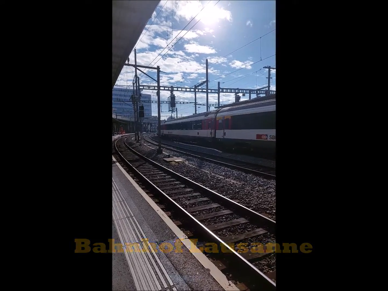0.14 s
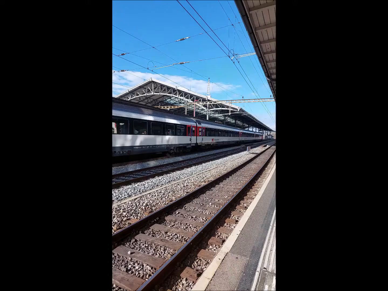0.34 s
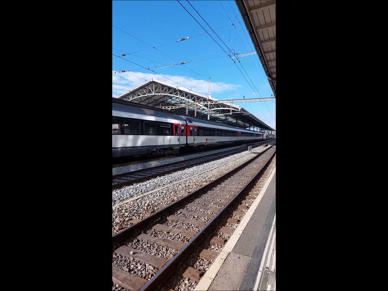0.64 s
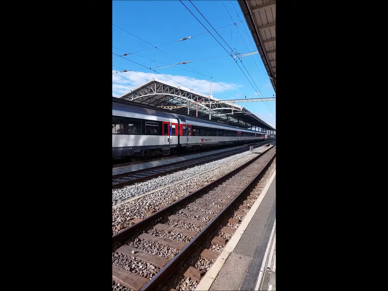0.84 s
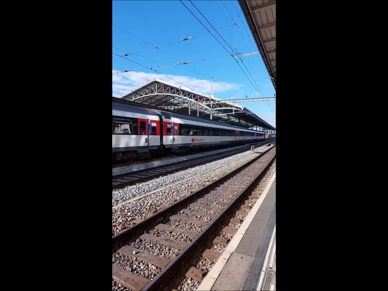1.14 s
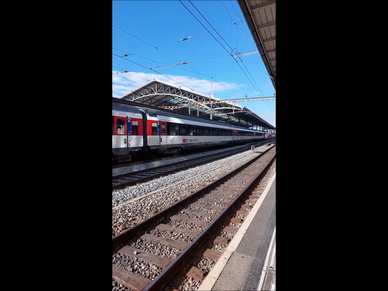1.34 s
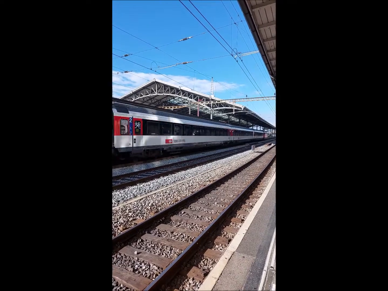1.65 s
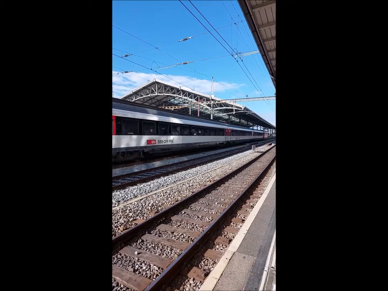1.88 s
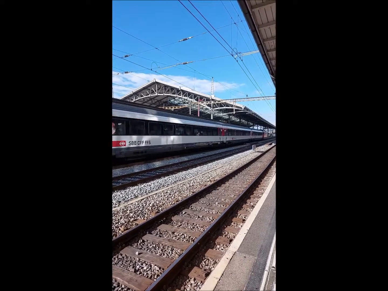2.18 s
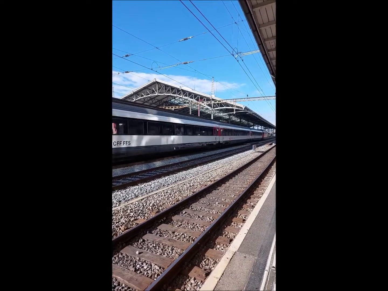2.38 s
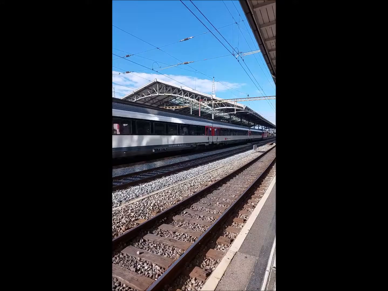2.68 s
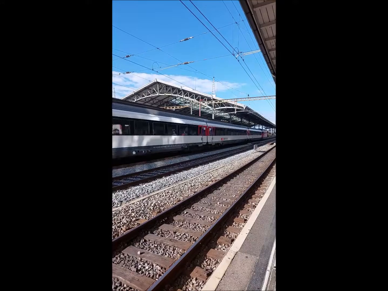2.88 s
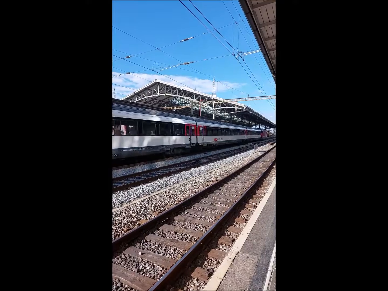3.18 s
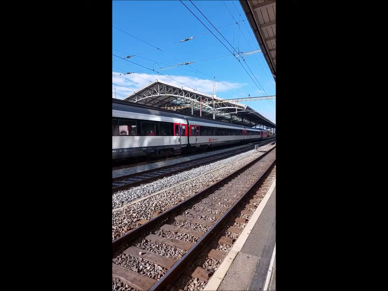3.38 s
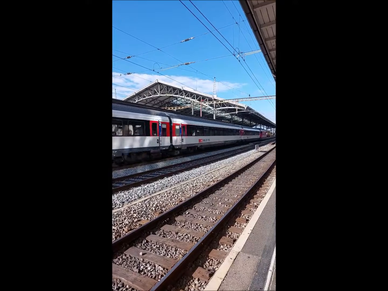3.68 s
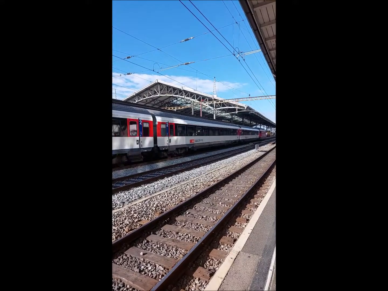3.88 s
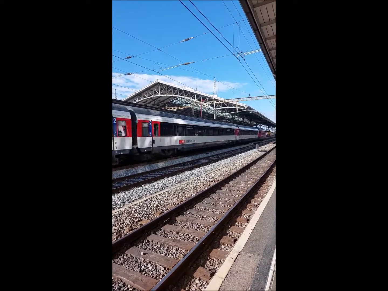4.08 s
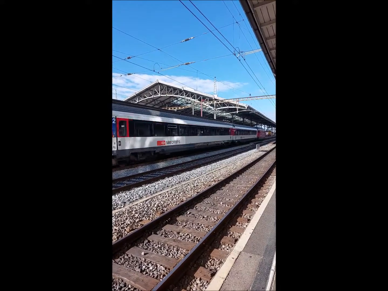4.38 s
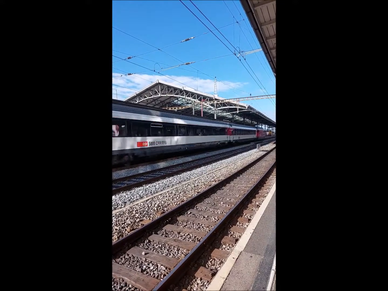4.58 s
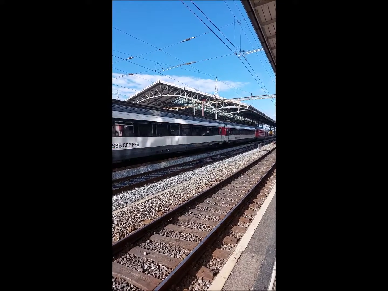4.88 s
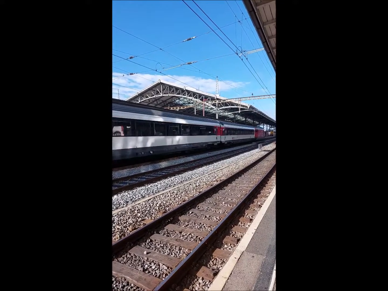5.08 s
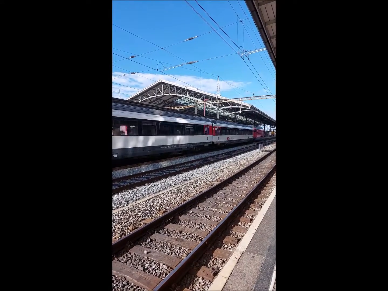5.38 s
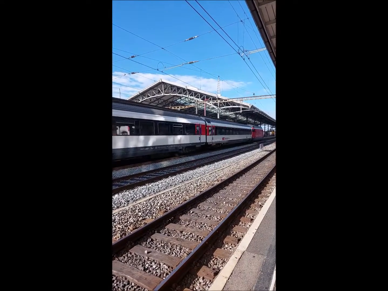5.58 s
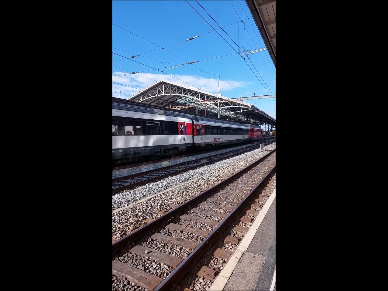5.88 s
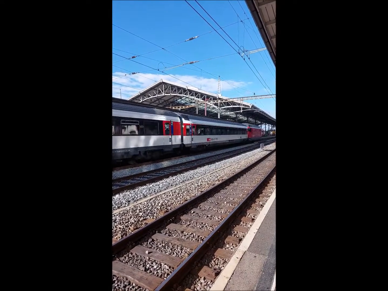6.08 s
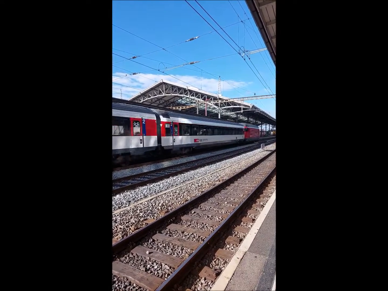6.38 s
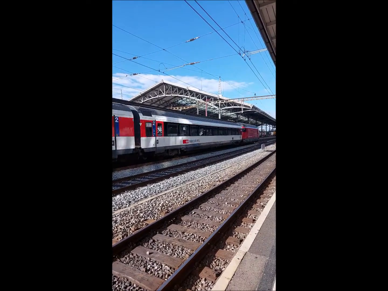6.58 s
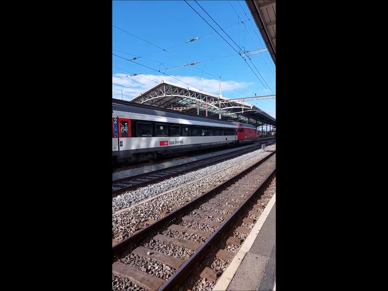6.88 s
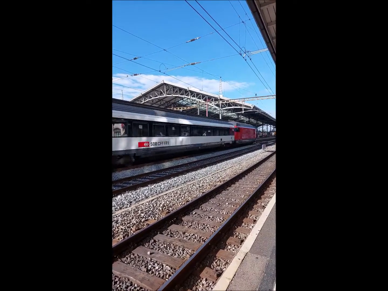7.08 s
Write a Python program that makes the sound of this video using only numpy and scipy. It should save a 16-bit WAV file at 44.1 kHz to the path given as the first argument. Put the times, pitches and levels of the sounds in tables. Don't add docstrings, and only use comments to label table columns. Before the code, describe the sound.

From 0 to 0.25 s a distant train gives a quiet, dull low rumble, then complete silence until about 0.47 s. The closer shot fades in over the next second: slow rolling rumble, soft bright hiss and faint very high wheel whistles. A low motor hum wavers in strength and rises slightly in pitch. Around 1.9 to 2.7 s the rolling grows heavier. At 2.85 s a wheel set bites suddenly, with a dull knock, rough grinding and several steady piercing squeals that overlap and swell until about 4.3 s. At 4.4 s the last set brings the strongest hiss and a denser chord of shrill tones, sinking slightly in pitch. Joint knocks follow near 4.5 and 4.8, hardest at 5.6, then 6.3 s. Squeals thin after 6.3 s while scraping continues; a final jolt and brief flare come near 7.1 s. Open-air stereo, treble wide, bass centred.

```python
import sys
import numpy as np
from scipy import signal
from scipy.fft import rfft, irfft, next_fast_len
from scipy.io import wavfile
from scipy.ndimage import uniform_filter1d, map_coordinates

SR = 44100
rng = np.random.default_rng(int(sys.argv[2]) if len(sys.argv) > 2 else 0)


def unload_audio(sound):
    columns = np.transpose(np.atleast_2d(sound))
    steps = np.round(np.clip(columns, -1, 1) * 32767)
    wavfile.write(sys.argv[1], SR, steps.astype(np.int16))


def invert_db(level):
    return 10 ** (np.asarray(level, dtype=float) / 20)


N = 319725

# start t/s, loudest t/s, end t/s, loudest level/dB, ending level/dB
EARLY_SQUEALS = [
    [(.47, .475, 0.78, -45, -51.5), (.8, 1.14, 1.45, -51.5, -58), (1.5, 1.9, 2.26, -50.5, -51),
     (2.1, 2.45, 2.64, -48.5, -47.5), (2.4, 2.75, 3.1, -48, -54), (2.8, 2.86, 3, -38.5, -42)],
    [(1.6, 1.95, 2.42, -52, -59), (2.4, 2.72, 2.93, -47, -52)],
    [(1.6, 1.95, 2.9, -58, -55)],
    [(2.83, 2.86, 2.98, -35.5, -45), (2.98, 3.33, 3.48, -37, -40), (4.1, 4.42, 4.93, -31.5, -49)],
    [(2.88, 2.97, 3.12, -36, -42), (2.95, 3.17, 3.4, -35, -37.5), (3.2, 3.32, 3.45, -43, -52)],
    [(2.84, 2.98, 3.3, -42, -42), (3.2, 3.46, 3.96, -31, -31), (3.6, 3.82, 4.1, -36, -32.5),
     (3.95, 4.13, 4.42, -35, -43.5)],
    [(3.4, 3.55, 4.3, -41.5, -42), (3.55, 3.78, 4.3, -39, -43), (3.9, 4.06, 4.4, -47, -59)],
    [(2.83, 2.88, 3.2, -38, -42), (2.95, 3.22, 3.8, -33, -36.5), (3.2, 3.45, 3.65, -32, -44),
     (3.55, 3.8, 4.7, -33, -39)],
]
# start t/s, loudest t/s, end t/s, loudest level/dB, ending level/dB
LAST_SQUEALS = [
    [(4.5, 4.55, 4.98, -34.5, -38.5), (4.8, 5.05, 5.47, -35.5, -43), (5.2, 5.42, 5.9, -38, -43)],
    [(4.55, 4.65, 4.95, -33.5, -33.5), (4.75, 5.1, 5.35, -31.5, -32), (5.1, 5.35, 5.84, -33, -34.5),
     (5.5, 5.85, 6.29, -29, -35.5), (6.0, 6.25, 6.94, -37, -42), (6.5, 6.85, 7.2, -42, -37)],
    [(4.6, 5.2, 5.58, -31, -30.5), (5.4, 5.65, 6.15, -31.5, -34.5), (5.9, 6.2, 6.9, -35, -45),
     (6.5, 6.8, 7.16, -46, -47)],
    [(4.68, 4.71, 4.6, -38, -46), (4.8, 4.95, 5.6, -30.5, -35.5), (5.3, 5.6, 6.25, -36.5, -39),
     (5.8, 6.15, 7.4, -40, -46)],
    [(4.39, 4.53, 4.9, -36, -46), (4.7, 4.92, 5.4, -34.5, -44), (5.1, 5.35, 6.0, -46, -46),
     (5.7, 6.1, 7.5, -50, -50)],
]
# first f/Hz, last f/Hz, glide ends t/s
MODE_GLIDES = [(4810, 4735, 2.0), (14512, 14518, 2.8), (9452, 9440, 2.8), (2368, 2364, 5.0),
               (3200, 3165, 3.4), (4005, 3930, 4.0), (8130, 8132, 4.2), (12140, 12070, 3.7),
               (3250, 3165, 5.8), (4702, 4552, 5.95), (7750, 7515, 6.6), (12415, 12145, 5.8),
               (14275, 14120, 5.1)]
# line width f/Hz, halo width f/Hz, halo level/dB
MODE_SHAPES = [(22, 300, 2), (7, 200, -4), (20, 400, 1), (14, 220, -1), (10, 180, -3), (8, 280, -2),
               (4, 300, -4), (9, 340, -2), (22, 220, 1), (9, 190, -1), (9, 260, -1), (9, 340, -1.5),
               (12, 240, -1)]


def squeals():
    flutter_db = 0.7
    blurs_per_db = 1.36
    out = np.zeros((2, N))
    for swells, glide, shape in zip(EARLY_SQUEALS + LAST_SQUEALS, MODE_GLIDES, MODE_SHAPES):
        first_hz, last_hz, settled_s = glide
        line_hz, halo_hz, halo_db = shape
        first_s, last_s = swells[0][0], swells[-1][2]
        a = round((first_s - CATCH_S) * SR)
        b = min(N, round((last_s + RELEASE_S) * SR))
        t = np.arange(a, b) / SR
        power = sum(swell_power(t, *row) for row in swells)
        level = np.sqrt(power) * invert_db(flutter_db * wobble(22)[a:b])
        sag_db = 20 * np.log10(np.maximum.accumulate(level) / level)
        pitch_hz = np.interp(t, [first_s, settled_s], [first_hz, last_hz])
        tone = sing(pitch_hz, 2.26, line_hz, halo_hz, halo_db + blurs_per_db * sag_db, alike=0.12)
        out[:, a:b] += level * tone
    return out


CATCH_S, RELEASE_S = .03, .08


def swell_power(t, start, top, end, top_db, end_db):
    times = [start - CATCH_S, start, top, end, end + RELEASE_S]
    levels_db = [top_db - 52, top_db - 14, top_db, end_db, end_db - 23]
    return invert_db(np.interp(t, times, levels_db)) ** 2


# start t/s, loudest t/s, end t/s, first f/Hz
SINKING_MODES = [(.47, 1.0, 2.2, 3955), (.7, .9, 1.6, 2345), (.47, .7, 1.0, 9650), (.9, 1.15, 1.7, 15560),
                 (2.84, 3.2, 3.9, 6680), (2.84, 3.2, 3.5, 9790), (2.84, 2.93, 3.15, 11430),
                 (2.84, 3.05, 3.3, 14140), (2.84, 2.9, 3.4, 14950), (4.45, 4.5, 5.0, 7700),
                 (4.39, 5.0, 6.0, 4045), (4.39, 4.6, 6.9, 5830), (4.39, 4.47, 4.75, 6730),
                 (4.39, 4.5, 5.0, 10520), (4.39, 4.7, 5.9, 11040), (4.39, 4.5, 4.8, 11600),
                 (4.39, 4.45, 5.0, 12120), (5.2, 5.7, 6.1, 15050), (5.0, 5.6, 7.25, 2330),
                 (6.3, 6.9, 7.25, 11610), (7.12, 7.21, 7.4, 2700), (7.12, 7.22, 7.4, 2120),
                 (7.1, 7.22, 7.4, 7630), (7.08, 7.18, 7.3, 3620), (7.08, 7.16, 7.3, 14520),
                 (7.08, 7.16, 7.3, 13600)]
# start t/s, loudest t/s, end t/s, f/Hz
HELD_MODES = [
    (1.7, 2.7, 2.9, 10933),
    (4.39, 4.5, 4.9, 15080),
    (3.4, 3.65, 3.9, 1408),
    (4.4, 4.8, 5.1, 482),
    (3.1, 3.25, 3.45, 337),
    (2.72, 2.84, 2.93, 285),
    (4.39, 4.5, 5.4, 9650),
    (7.02, 7.08, 7.14, 95),
    (5.25, 5.38, 5.5, 4000),
]
WEAK_LEVELS = [-58.5, -55.5, -54, -59, -43.5, -41.5, -41, -44, -45, -56, -40, -46, -36.5, -40, -37, -38,
               -37, -47, -46, -56, -39, -42.5, -41, -46, -45, -44, -67, -47, -55, -48.5, -45, -33, -40, -43,
               -38]


def weak_squeals():
    pitch_losses = [.01] * len(SINKING_MODES) + [0] * len(HELD_MODES)
    out = np.zeros((2, N))
    for mode, loss, peak_db in zip(SINKING_MODES + HELD_MODES, pitch_losses, WEAK_LEVELS):
        start, top, end, hz = mode
        a = round(start * SR)
        t = np.arange(a, min(N, round(end * SR))) / SR
        swell_db = np.interp(t, [start, start + 0.028, top, end], [-9, -3.5, 1.0, -12.5])
        pitch_hz = hz * (1 - loss * (t - start))
        alike = along(LIKENESS, hz) + 0.11
        tone = sing(pitch_hz, peak_db + swell_db + 3.5, 14.6, hz / 22, 2.0, alike)
        out[:, a:a + len(t)] += tone
    return out


# t/s, level/dB
FLANGE_PRESSURE = [(.46, -39.5), (1.33, -41.5), (1.45, -46), (2.18, -48), (2.41, -47), (2.8, -43),
                   (2.86, -29), (3.4, -28.5), (3.65, -34.5), (4.1, -33), (4.38, -29.5), (4.42, -22.5),
                   (4.6, -24), (5.1, -25), (5.5, -26.5), (7.0, -28), (7.09, -29), (7.17, -25)]
# t/s, changeover time/s
HISS_CHANGES = [
    (1.65, 0.57),
    (2.825, 0.03),
    (4.39, 0.04),
]
# f/Hz, level per Hz/dB
HISS_COLOURS = [
    [(2500, -19), (3300, -9), (4300, -7), (5400, -3.5), (5800, -4), (6200, -7), (7400, -3.5), (8200, -7),
     (8650, -7), (9500, -3.5), (10500, -5), (12800, -1), (14000, -7), (15700, -5)],
    [(2500, -30), (3300, -7), (4300, -7), (5150, -16), (5650, -24), (6400, -16), (7400, -12), (8200, -14),
     (8620, -31), (9300, -4), (10500, -6), (12800, 3), (14000, -3), (15700, -3)],
    [(2500, -26), (3000, -6), (3450, -14), (3900, -5), (4450, -7), (4800, 1.5), (5400, -3.5), (6200, -3),
     (6700, -1), (7600, 0.5), (8800, -4.5), (9600, -2.5), (10700, -6.5), (11900, 3.5), (14200, -6.5),
     (15700, -5)],
    [(2000, -22.5), (2750, -4), (3450, -10.5), (3900, -6.5), (4300, -8.5), (4800, -2.5), (5300, -10.5),
     (5750, -3.5), (6250, -13), (6500, -5.5), (7600, -3.5), (8700, -10), (9600, -6.5), (10500, -9),
     (12200, -2.5), (13200, -5.5), (14000, -8), (14700, -15), (15700, -3.5)],
]
# f/Hz, level per Hz/dB
GRIND_COLOUR = [(700, -12.5), (1200, -8.5), (1800, -3.5), (2400, 0.5), (3300, -8.5), (4200, -7),
                (4900, -28), (5300, -70)]
# t/s, extra level/dB
BITES = [
    (2.86, 5.5),
    (4.2, 4),
    (7.2, 2.5),
]
USUAL_PRESSURE_DB = -30


def scrape():
    hiss_db, = curves(FLANGE_PRESSURE)
    press_db = hiss_db - USUAL_PRESSURE_DB
    flutter_db = 0.3 * wobble(30) + .3 * wobble(9)
    bite_db = flares(BITES, rise_s=0.035, fall_s=0.19)
    grind_db = -39 + 0.82 * press_db + bite_db + 0.79 * wobble(5.4)
    t = np.arange(N) / SR
    arrived = [np.clip((t - s) / over + .5, 0, 1) for s, over in HISS_CHANGES]
    shares = -np.diff([np.ones(N), *arrived, np.zeros(N)], axis=0)
    hiss = np.zeros((2, N))
    for share, colour in zip(shares, HISS_COLOURS):
        hiss += np.sqrt(np.abs(share)) * rush(colour, patchy_db=1.5)
    grind = rush(GRIND_COLOUR, patchy_db=1.8)
    return invert_db(flutter_db) * (invert_db(hiss_db) * hiss + invert_db(grind_db) * grind)


# t/s, level/dB
TRACK_LOAD = [(.46, -45.5), (1.0, -46), (1.85, -43.5), (2.05, -39), (2.3, -38.5), (2.58, -37),
              (2.72, -35.5), (2.84, -36), (2.93, -37.5), (3.6, -41.5), (4.4, -39), (5.4, -40), (6.0, -39.5),
              (6.9, -38), (7.25, -37)]
# t/s, extra level/dB
JOINTS = [
    (1.95, 3.5),
    (2.84, 6.5),
    (4.54, 5.5),
    (4.83, 5),
    (5.57, 11.5),
    (5.79, 4.5),
    (6.28, 6),
    (6.91, 0.5),
    (7.075, 8.5),
]
# f/Hz, level per Hz/dB
GROUND_COLOUR = [(22, -40), (40, -12), (60, -0.5), (110, -1.5), (170, -1.5), (260, -62)]
# t/s, f/Hz
SLEEPER_PITCH = [(.46, 272.8), (1.2, 261), (2.7, 272.1), (3.4, 257.4), (5.5, 252.4), (6.7, 239.6),
                 (7.25, 265.2)]
# f/Hz, level per Hz/dB
TRACK_COLOUR = [(120, -24), (190, -5), (230, -6.5), (270, -1), (320, -4.5), (400, -10), (460, -7),
                (560, -48)]
# f/Hz, level per Hz/dB
ROAR_COLOUR = [(300, -35), (430, -2.5), (480, 4), (560, 0), (800, -5.5), (1020, -5), (1500, -9.5),
               (2500, -20)]


def rolling():
    usual_load_db = -40
    load_db = curves(TRACK_LOAD)[0] - usual_load_db
    press_db = curves(FLANGE_PRESSURE)[0] - USUAL_PRESSURE_DB
    joint_db = flares(JOINTS, rise_s=0.028, fall_s=0.041)
    jolt = wobble(14)
    ground_db = -46.5 + 1.08 * load_db + 0.14 * press_db + 0.5 * joint_db + 2.9 * wobble(4.818)
    ground = invert_db(ground_db + 0.59 * jolt) * rush(GROUND_COLOUR, patchy_db=1.0)
    boom = sing(curves(SLEEPER_PITCH)[0], -5.0, 8.9, 39.4, 3.5, alike=0.96)
    rattle = invert_db(-1.0) * rush(TRACK_COLOUR, patchy_db=1.0)
    track = invert_db(usual_load_db + load_db + joint_db + 1.3 * jolt) * (boom + rattle)
    roar_db = -44.5 + 0.96 * load_db + 0.17 * press_db + 0.78 * joint_db + 0.56 * wobble(7.8)
    roar = invert_db(roar_db + 0.46 * jolt) * rush(ROAR_COLOUR, patchy_db=2.0)
    return ground + track + roar


# t/s, f/Hz
MOTOR_PITCH = [(.46, 144.7), (1.5, 147.6), (3.7, 150.2), (4.2, 156.8), (5.5, 158.9), (7.25, 164)]
# t/s, level/dB
MOTOR_EFFORT = [(0.5, -77), (0.8, -58.5), (1.74, -48.5), (1.8, -56), (1.93, -40.5), (2.4, -49.5),
                (2.81, -33), (2.91, -57.5), (3.94, -38.5), (4.0, -48), (5.07, -42.5), (5.58, -46.5),
                (5.63, -35), (5.74, -52), (5.91, -38), (7.25, -44)]
# multiple of the fundamental, level/dB
MOTOR_ORDERS = [(1, 2.5), (2, -4.5), (3, -11.5)]


def motor():
    hz, = curves(MOTOR_PITCH)
    effort_db, = curves(MOTOR_EFFORT)
    out = np.zeros((2, N))
    for order, level_db in MOTOR_ORDERS:
        out += sing(order * hz, effort_db + level_db - 2.5, 4.0, 25.94, -4.0, alike=0.93)
    return out


# t/s, level/dB
FAR_LEVEL = [(0.0, -52.5), (0.086, -53.5), (0.26, -61)]
# f/Hz, level per Hz/dB
FAR_COLOUR = [(15, -58), (25, -30), (45, -18), (74, -7), (123, -17), (185, -22), (236, -10), (344, -23),
              (416, -22), (734, -30), (6740, -47.5), (8590, -49), (16000, -49)]


def far_train():
    return invert_db(curves(FAR_LEVEL)[0] + 3.0) * rush(FAR_COLOUR, patchy_db=-1.5)


def sing(hz, db, line_hz, halo_hz, halo_db, alike):
    lead = 3000
    n = len(hz)
    line = blur(n + lead, line_hz, alike)
    line = unit(line / (np.abs(line) ** .75 + .05))[:, lead:]
    above = np.exp(.2j * np.pi * halo_hz * np.arange(n) / SR)
    halo = above * blur(n + lead, halo_hz / 2, alike / 2)[:, lead:]
    envelope = (line + invert_db(halo_db) * halo) / np.sqrt(1 + invert_db(2 * halo_db))
    carrier = np.exp(2j * np.pi * np.cumsum(hz) / SR)
    return np.sqrt(2) * invert_db(db) * np.real(envelope * carrier)


def blur(size, width_hz, alike):
    poles = np.exp(-2 * np.pi * width_hz * np.array([.5, 1.9]) / SR)
    noise = rng.standard_normal((3, size)) + 1j * rng.standard_normal((3, size))
    share = np.clip(alike, 0, 1)
    pair = np.sqrt(1 - share) * noise[:2] + np.sqrt(share) * noise[2]
    return unit(signal.lfilter([1], np.poly(poles), pair))


# f/Hz, left-right likeness (0 to 1)
LIKENESS = [(30, 0.35), (70, 0.77), (150, 0.98), (300, 0.9), (600, 0.55), (1200, 0.25), (2500, 0.065),
            (8000, 0.0077)]


def rush(spectrum, patchy_db):
    z = signal.stft(rng.standard_normal((2, N)), nperseg=512)[2]
    patches = uniform_filter1d(rng.standard_normal(z.shape[1:]), 5, 0)
    patches = unit(uniform_filter1d(patches, 10, 1))
    pair = signal.istft(z * invert_db(patchy_db * patches), nperseg=512)[1][:, :N]

    def mid_side(hz):
        angle = np.arccos(np.clip(along(LIKENESS, hz), -1, 1)) / 2
        return invert_db(along(spectrum, hz)) * [np.cos(angle), np.sin(angle)]

    mid, side = filtered(pair, mid_side)
    return unit(np.array([mid + side, mid - side]))


def flares(rows, rise_s, fall_s):
    t = np.arange(N) / SR
    return sum(db * np.exp(-np.abs(t - s) / np.where(t < s, rise_s, fall_s)) for s, db in rows)


def wobble(rate):
    knots = rng.standard_normal(int(N * rate / SR) + 4)
    return map_coordinates(knots, [np.arange(N) * rate / SR], order=1)


def curves(rows):
    s, *cols = np.transpose(rows)
    return [np.interp(np.arange(N) / SR, s, c) for c in cols]


def along(points, hz):
    f, v = np.transpose(points)
    return np.interp(np.log(hz + 1), np.log(f + 1), v)


def filtered(x, response):
    m = next_fast_len(N + 8192)
    return irfft(rfft(x, m) * response(np.fft.rfftfreq(m, 1 / SR)), m)[..., :N]


def unit(x):
    return x / np.sqrt(np.mean(np.abs(x) ** 2) + 1e-20)


# from t/s, to t/s
SILENCE = (.2535, .4675)
# from t/s, duration/s
FADE_IN = (0.4, 0.96)


def scene():
    t = np.arange(N) / SR
    fade = np.clip((t - FADE_IN[0]) / FADE_IN[1], 0, 1)
    near = fade * (squeals() + weak_squeals() + scrape() + rolling()) + motor()
    return (t < SILENCE[0]) * far_train() + (t > SILENCE[1]) * near


def low_pass(x):
    return signal.sosfilt(signal.butter(12, 15970, fs=SR, output="sos"), x)


# f/Hz, left minus right level/dB
PORT_SHADING = [(30, -3.5), (150, -2.5), (300, -0.5), (600, -2), (1600, 0), (2300, -1.5), (3100, 1.5),
                (4100, -4.5), (5500, 2), (7300, -6.5), (9000, 2), (11000, -3.5), (12300, -2.5), (14000, -6)]


def record(dry):
    lag_s, lag_fades_hz, top_hz = 5e-5, 4000, 15740

    def ports(hz):
        shading = invert_db(np.outer([.5, -.5], along(PORT_SHADING, hz)))
        phase = np.pi * hz * lag_s * np.exp(-hz / lag_fades_hz)
        return shading * np.exp(np.outer([-1j, 1j], phase)) * (hz < top_hz)

    t = np.arange(N) / SR
    sounding = (t < SILENCE[0]) | (t > SILENCE[1])
    return low_pass(filtered(dry, ports) * sounding)


dry = scene()
out = record(dry)
unload_audio(out)
```